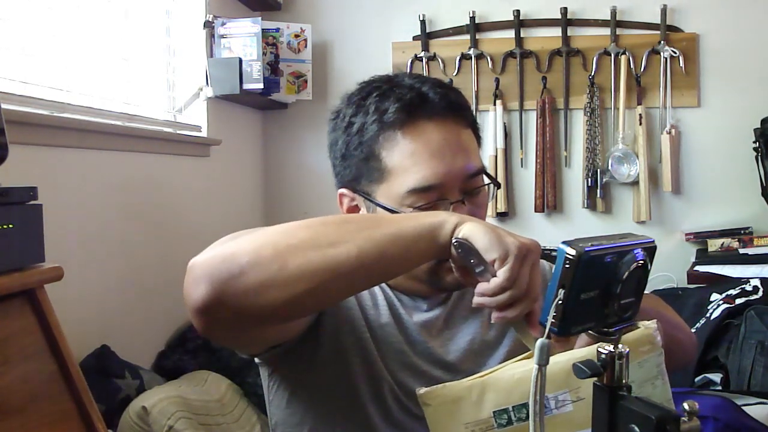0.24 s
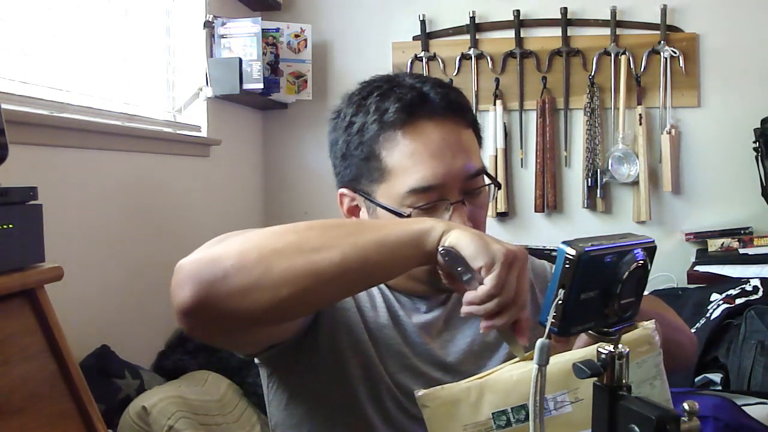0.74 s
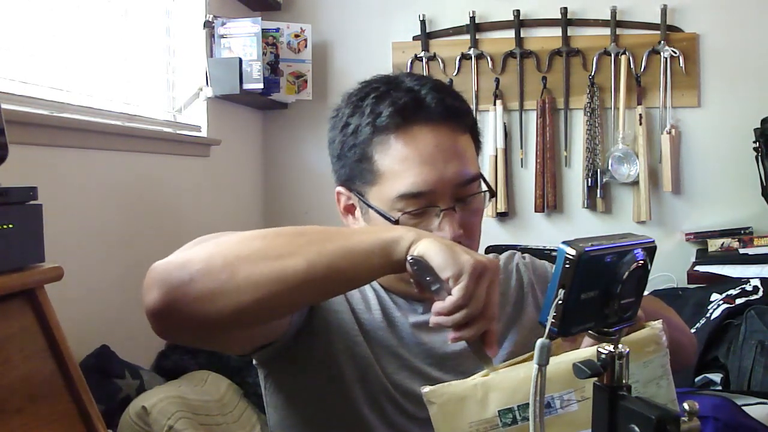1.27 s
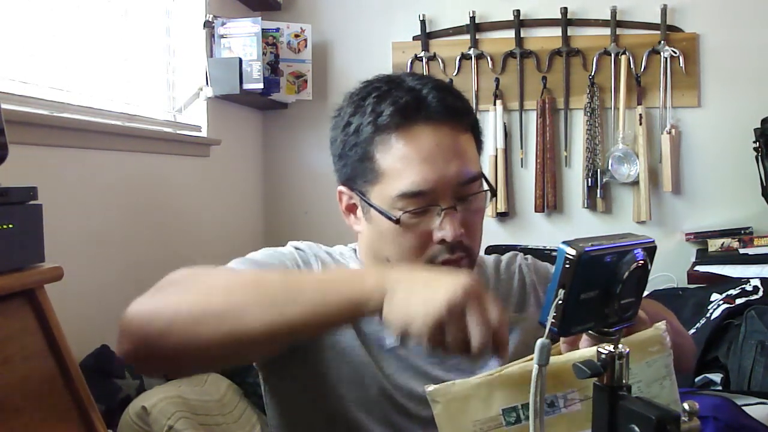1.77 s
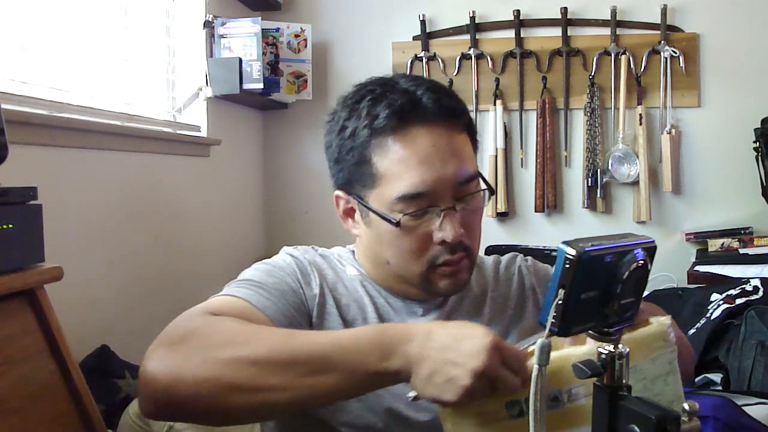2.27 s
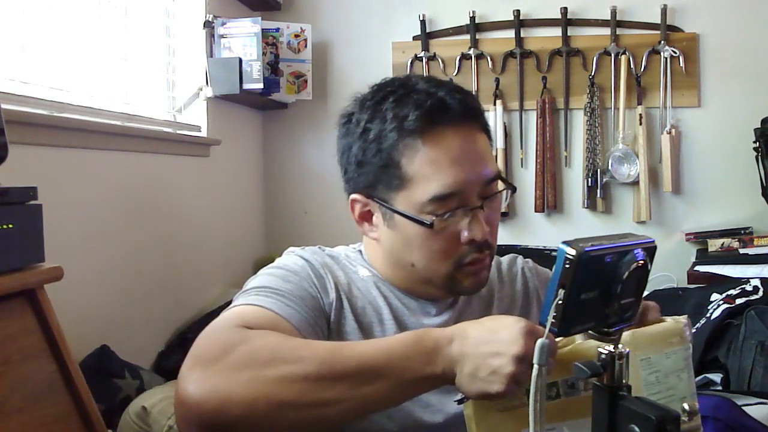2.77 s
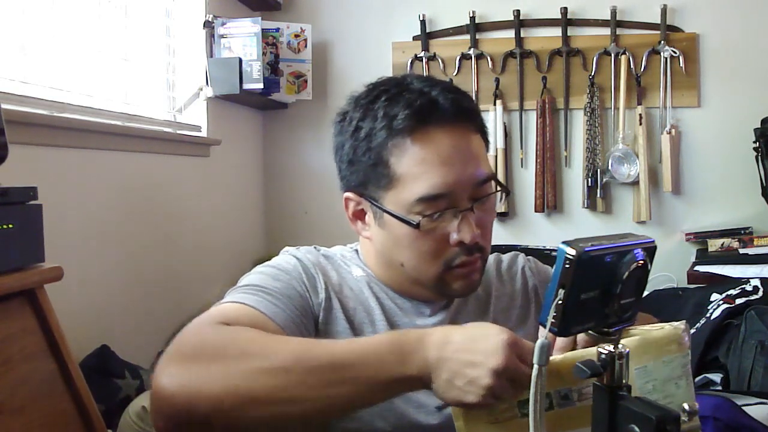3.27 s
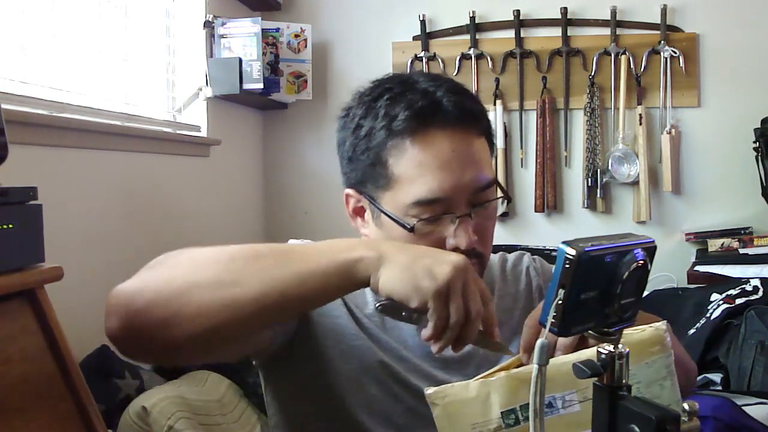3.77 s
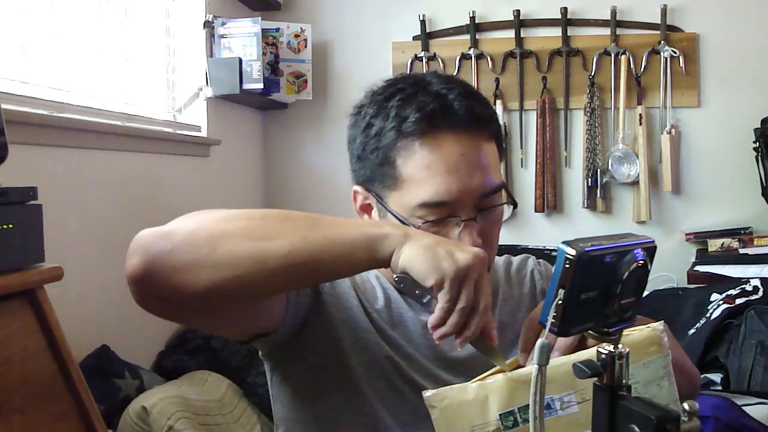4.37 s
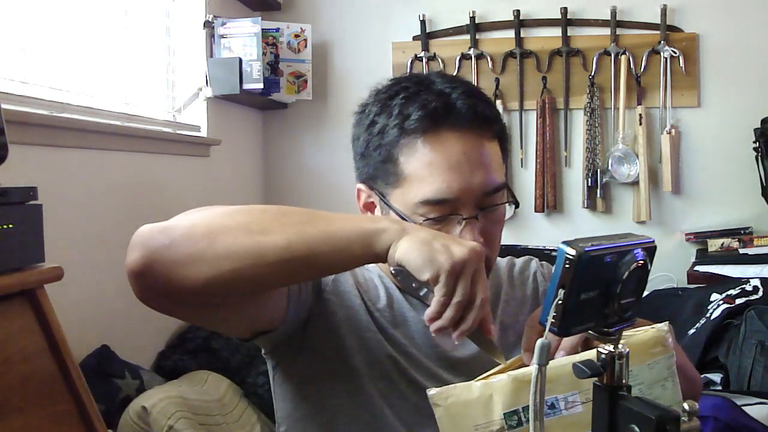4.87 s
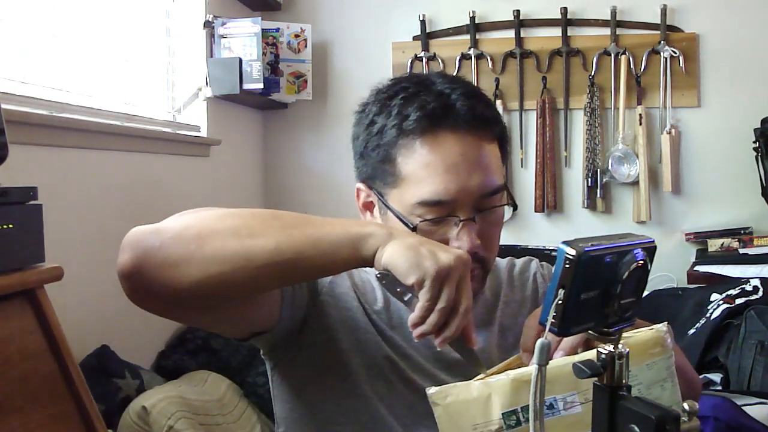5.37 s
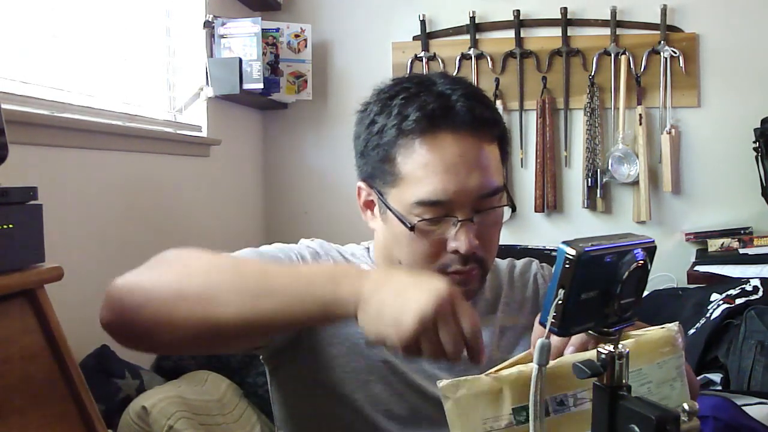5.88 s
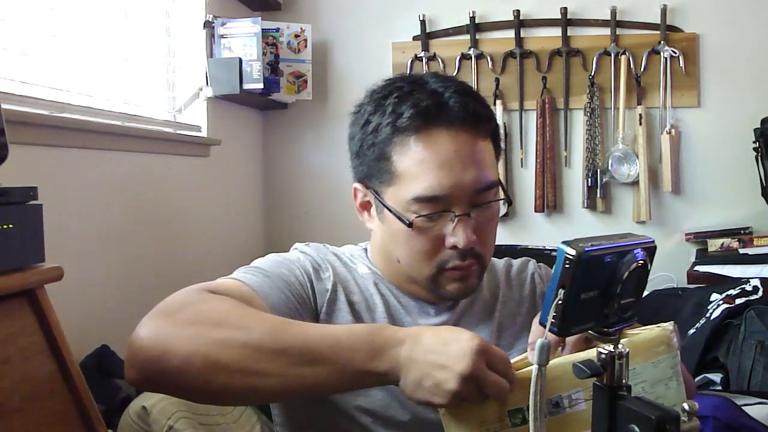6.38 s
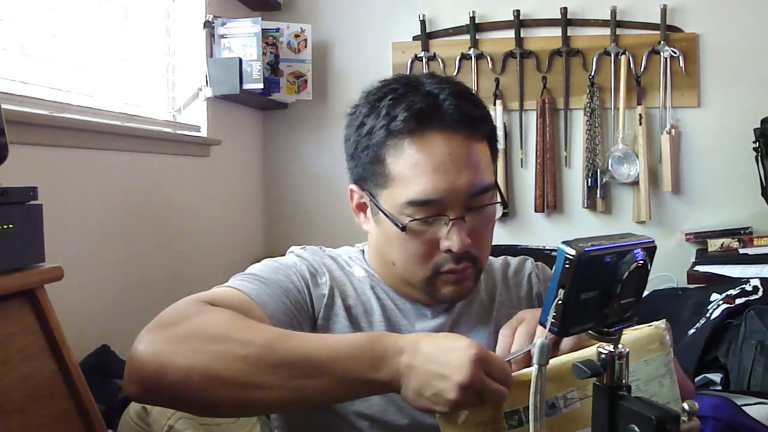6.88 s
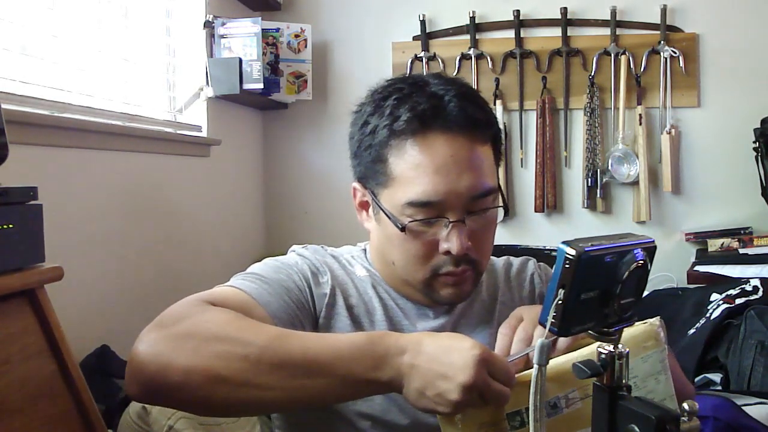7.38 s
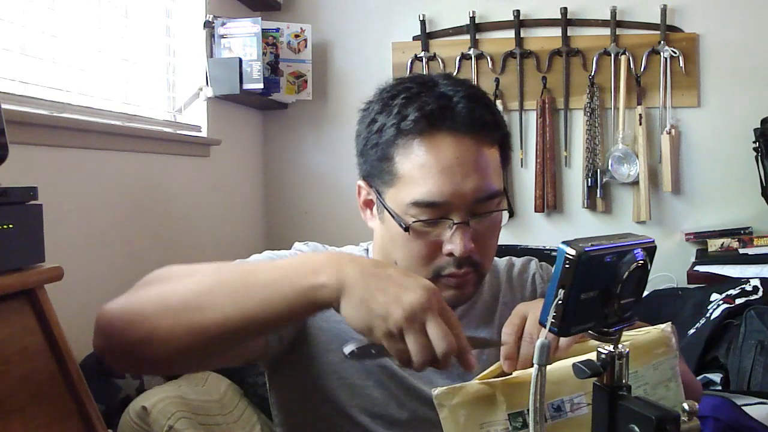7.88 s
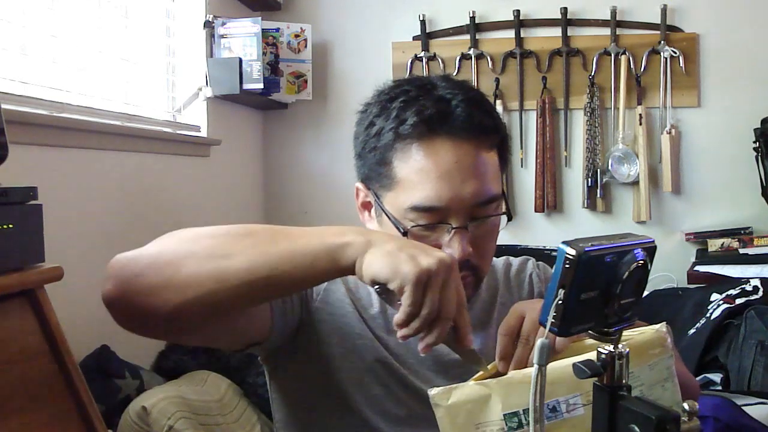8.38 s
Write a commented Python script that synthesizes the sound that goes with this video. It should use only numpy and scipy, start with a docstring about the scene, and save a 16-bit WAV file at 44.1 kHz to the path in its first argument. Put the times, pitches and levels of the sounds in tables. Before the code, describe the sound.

A small knife slits a padded paper envelope in irregular bursts of tearing, rustling and sharp crinkles, over a faint fan hum.

```python
"""At a desk in a small soft room, close to a cheap camera microphone: a knife slits a padded envelope.
The blade tears fibres in dense bursts, the paper rustles and buckles with sharp snaps, and a finger
squeaks once on the film. Desk and walls throw it all back. Behind it a fan hums under the microphone's
hiss and thin electric ticks; the camera's low sample rate cuts off and mirrors the treble."""
import sys
import numpy as np
from scipy import signal
from scipy.fft import rfft, irfft, next_fast_len
from scipy.io import wavfile
from scipy.ndimage import uniform_filter1d

SR = 44100
rng = np.random.default_rng(int(sys.argv[2]) if len(sys.argv) > 2 else 0)


def wav_record(signal):
    """Record a signal, one row per channel, as 16-bit PCM in the file named by sys.argv[1]."""
    frames = np.transpose(np.atleast_2d(signal))
    bounded = np.clip(frames, -1, 1)
    # unit amplitude maps onto the largest positive 16-bit level
    quanta = np.round(bounded * 32767).astype(np.int16)
    wavfile.write(sys.argv[1], SR, quanta)


N = 381024


def amp(db):
    return 10 ** (np.asarray(db) / 20)


def unit_rms(x):
    return x / np.sqrt(np.mean(x ** 2) + 1e-20)


def curve_at(points, hz):
    freq_hz, value = np.transpose(points)
    return np.interp(np.log(hz + 1), np.log(freq_hz + 1), value)


def add(mix, start_s, sound):
    part = mix[round(start_s * SR):][:len(sound)]
    part += sound[:len(part)]


def resonate(x, hz, width_hz):
    """Two-pole resonance of gain 1 at its centre."""
    b, a = signal.iirpeak(hz, hz / width_hz, SR)
    return signal.lfilter(b, a, x)


def low_pass(x, hz):
    return signal.oaconvolve(x, signal.firwin(1023, hz, window=("kaiser", 11), fs=SR), "same")


def minimum_phase(gain_db):
    """Shortest impulse response with the given spectrum (folded cepstrum)."""
    cepstrum = irfft(gain_db * np.log(10) / 20)
    cepstrum[1:len(cepstrum) // 2] *= 2
    cepstrum[len(cepstrum) // 2 + 1:] = 0
    return irfft(np.exp(rfft(cepstrum)))


# Room tone, the fan's air and the microphone's own hiss: freq_hz, relative_db
HISS_SPECTRUM = [(18, -62), (30, -32.5), (190, -9), (304, -8), (352, -6.5), (702, -6), (774, -7), (920, -9),
                 (1660, -13), (1790, -13.5), (4450, -21), (5420, -20.5), (10800, -34), (14000, -67),
                 (22000, -120)]
# Hum of the fan in the room: pitch_hz, width_hz, level_db
FAN_TONES = [(299.2, 21, -53.5), (247.3, 8.4, -66)]


def fan_and_hiss(hiss_db=-47.5):
    """The bed of the room: smooth hiss with faint drifting patches, and fuzzy fan tones."""
    frames, hz = N // 256 + 5, np.fft.rfftfreq(1024, 1 / SR)
    real, imag, patches = rng.standard_normal((frames, 513, 3)).T
    patches = unit_rms(uniform_filter1d(uniform_filter1d(patches, 12, 0), 14, 1))
    spectra = (real + 1j * imag) * amp(curve_at(HISS_SPECTRUM, hz)[:, None] + 0.4 * patches)
    bed = amp(hiss_db) * unit_rms(signal.istft(spectra, nperseg=1024, noverlap=768)[1][:N])
    t = np.arange(N) / SR
    for pitch_hz, width_hz, level_db in FAN_TONES:
        fuzz = unit_rms(resonate(rng.standard_normal(N), pitch_hz, width_hz))
        bed += amp(level_db) * (0.64 * fuzz + 1.03 * np.sin(2 * np.pi * pitch_hz * t))
    return bed


# Resonances that colour each tick: pitch_hz, width_hz, relative_db
TICK_COLOUR = [(5500, 1300, 6), (6600, 1300, 7)]
# The ticks come and go: time_s, level_db
TICK_LEVELS = [(0, -44), (1.3, -44), (1.45, -35), (2.0, -37.5), (2.3, -44), (3.8, -45), (4.0, -41.5),
               (4.9, -41), (5.2, -39), (8.2, -49), (8.4, -42), (8.64, -40.5)]


def electric_ticks(rate_hz=59.93, first_s=.0026):
    """Thin dry ticks at a steady rate, probably the camera's electronics; one in five drops out."""
    times = np.arange(first_s, N / SR, 1 / rate_hz)
    sizes = amp(3.4 * rng.standard_normal(len(times)))
    train = np.zeros(N)
    train[(times * SR).astype(int)] = sizes * (rng.random(len(times)) < .8)
    ticks = sum(amp(db) * resonate(resonate(train, hz, width), hz, width)
                for hz, width, db in TICK_COLOUR)
    level_db = np.interp(np.arange(N) / SR, *np.transpose(TICK_LEVELS))
    return amp(level_db) * ticks / np.percentile(abs(ticks), 99.9)


# Decay of the small soft room: freq_hz, t60_s
WALL_DECAY = [(400, 0.073), (1000, 0.17), (2800, 0.14), (7400, 0.2)]


def wall_tail(level_db):
    """Sparse random reflections from the walls, each band dying at its own speed."""
    taps = np.zeros(SR // 2)
    slots = np.arange(200, len(taps) - 10, 10)
    taps[slots + rng.integers(0, 10, len(slots))] = rng.choice([-1., 1.], len(slots))
    hz, t, spectra = signal.stft(taps, SR, nperseg=128)
    decay = amp(-60 * t / curve_at(WALL_DECAY, hz)[:, None])
    tail = signal.istft(spectra * decay, SR, nperseg=128)[1]
    return amp(level_db) * tail / np.linalg.norm(tail)


# Desk, chest and wall as heard at the microphone: delay_ms, level_db
NEAR_ECHOES = [(1.4, -17), (2.3, -16), (5.2, -28), (7.5, -22), (11.5, -17.5)]


def room(x, tail_db, crossfade_hz=7):
    """Direct sound, near echoes, and four random tails steadily crossfaded so that no pitch rings."""
    near = np.zeros(SR // 50)
    near[0] = 1
    for delay_ms, level_db in NEAR_ECHOES:
        near[round(delay_ms * SR / 1000)] += amp(level_db)
    out = signal.oaconvolve(x, near)[:N]
    turn = np.pi * crossfade_hz * np.arange(N) / SR
    for k in range(4):
        share = np.sqrt(.5) * np.cos(turn + np.pi * k / 4)  # squares of the four shares sum to 1
        out += signal.oaconvolve(x * share, wall_tail(tail_db))[:N]
    return out


# A finger drags on the envelope's film: time_s, pitch_hz, level_db
SQUEAK_PATH = [(3.851, 1180, -56), (3.861, 1020, -61), (3.874, 1030, -38), (3.912, 1116, -47),
               (3.95, 1010, -49)]


def finger_squeak():
    """One breathy squeak: a gliding tone whose level stutters."""
    out = np.zeros(N)
    time_s, pitch_hz, level_db = np.transpose(SQUEAK_PATH)
    t = np.arange(time_s[0], time_s[-1], 1 / SR)
    stutter = 1 + 0.78 * unit_rms(uniform_filter1d(rng.standard_normal(len(t)), 150))
    tone = np.sin(2 * np.pi * np.cumsum(np.interp(t, time_s, pitch_hz)) / SR) * stutter
    add(out, time_s[0], amp(np.interp(t, time_s, level_db)) * tone * signal.windows.tukey(len(t), .3))
    return out


# Modes of the padded pouch: pitch_hz, base_width_hz, relative_db
POUCH_MODES = [(829, 47, 5), (1220, 45, -1), (1502, 52, -1.5), (1904, 25, 3), (2420, 24.5, 4.5),
               (3100, 66, -13), (3060, 250, -20), (3790, 53, -11), (4513, 37, -7.5), (4860, 710, -13.5),
               (5830, 270, -15)]


def pouch(x, ring_db, widen=3.6):
    """The air-filled pouch rings a little at its own modes."""
    ring = sum(amp(db) * resonate(x, hz, widen * width) for hz, width, db in POUCH_MODES)
    return x + amp(ring_db) * ring


# Colour of tearing paper, heard close: freq_hz, relative_db
PAPER_SPECTRUM = [(150, -56), (250, -26), (293, -2.5), (516, -8.5), (567, -0.5), (802, -9.5), (1030, -1),
                  (1560, -0.5), (4540, -1), (10800, -16.5), (14000, -100), (22000, -120)]


def breaking_fibres(motion, clump_db, size_db, breaks_per_s=12000):
    """Fibres break as dense, uneven clicks in clumps; motion(hz, t) shapes their level and colour."""
    clumps = amp(clump_db * unit_rms(uniform_filter1d(rng.standard_normal(N), 180)))
    sizes = amp(size_db * np.minimum(rng.exponential(1, N), 5)) * rng.choice([-1., 1.], N)
    breaks = clumps * sizes * (rng.random(N) < breaks_per_s / SR)
    hz, t, spectra = signal.stft(unit_rms(pouch(breaks, ring_db=0.25)), SR, nperseg=256, noverlap=192)
    hz = hz[:, None] + 1
    patches = rng.standard_normal(spectra.T.shape)
    patches = unit_rms(uniform_filter1d(uniform_filter1d(patches, 24, 0), 4, 1)).T
    colour = amp(curve_at(PAPER_SPECTRUM, hz))
    colour /= np.sqrt(np.mean(colour ** 2 * (hz > 1500) * (hz < 4500)))
    shaped = spectra * colour * motion(hz, t) * amp(1.7 * patches)
    return signal.istft(shaped, SR, nperseg=256, noverlap=192)[1][:N]


def grip_db(hz, boom_db, fizz_db):
    """The grip on the paper tilts the low end (boom of the pouch) and the high end (fizz)."""
    return np.clip(np.log2(2200 / hz), 0, 1) * boom_db + np.clip(np.log2(hz / 3600), 0, 1) * fizz_db


# Fingers shift the envelope at the desk throughout: time_s, level_db, boom_db, fizz_db
FINGER_MOVES = [(0, -45, 7, 3), (.1, -36, -17, -15), (.2, -61, -10, -10), (.64, -71, -14, -15),
                (1.42, -56, -12, -0.5), (2.12, -55.5, 4.5, 1), (2.4, -51.5, -3, -2), (2.64, -53, 2, 4.5),
                (2.98, -47.5, 0.5, 1.5), (3.4, -56.5, 2, -11), (3.56, -46, 1, -7), (3.75, -57, -5, 1),
                (4.9, -58, -2, -7), (5.55, -50.5, 7, 5), (5.75, -60, -13, 5), (6.25, -52.5, 3, -7),
                (6.4, -50, -1, 1), (6.53, -54.5, -5, -3), (7.7, -57.5, -2, 1), (8.1, -59, -10, -12),
                (8.64, -61, -2, -5)]


def fingers(hz, t):
    """The rustle of handling follows one slow curve of level and grip."""
    time_s, *columns = np.transpose(FINGER_MOVES)
    level_db, boom_db, fizz_db = (np.interp(t, time_s, column) for column in columns)
    return amp(level_db + grip_db(hz, boom_db, fizz_db))


def handling_snaps(per_s=4, above_handling_db=17, spread_db=3):
    """Rows of small snaps that fall at random, following the strength of the handling."""
    when, pitch = rng.random((round(per_s * N / SR), 2)).T
    scatter_db = spread_db * rng.standard_normal((len(when), 4))
    start_s = when * N / SR
    handling_db = np.interp(start_s, *np.transpose(FINGER_MOVES)[:2])
    peak_db = handling_db + above_handling_db + scatter_db[:, 0]
    colour_db = scatter_db[:, 1:] + (-18, -9, -9)  # boom, body, crack
    return list(zip(start_s, peak_db, 720 * 5 ** pitch, *colour_db.T))


# Paper buckles near the microphone: start_s, peak_db, pitch_hz, boom_db, body_db, crack_db
BUCKLES = [(0.0545, -1.5, 1320, -13, -15, -35), (0.1278, -27, 3810, -21, -18, -20),
           (0.164, -30.5, 1210, -17, -23, -34), (0.222, -30.5, 1980, -17, -8, -19),
           (0.2502, -22.5, 2740, -20, -8, -18.5), (0.3006, -29, 1500, -16, -10, -16.5),
           (0.401, -11, 1240, -16, -17.5, -26.5), (0.5132, -17, 2800, -27, -1, -11.5),
           (0.5568, -20, 4400, -24, -7, -16), (0.6335, -27.5, 3810, -16, -8, -16),
           (0.9464, -11, 2430, -17, -5, -16), (1.3117, -30, 1350, -3, -6, -20),
           (1.589, -20, 1570, -13, -18, -24), (1.6146, -6, 4300, -8, -7, -24),
           (1.6464, -19.5, 2670, -26, -11, -16), (1.7479, -30, 740, -19, -9, -11),
           (1.7707, -30, 732, -15, -6, -9), (1.8827, -29, 1890, -10, -6, -21),
           (1.9121, -30.5, 800, -5, -12, -19), (1.9924, -27.5, 1520, -22, -19, -31),
           (2.2509, -21.5, 1440, -12, -19, -35), (2.3078, -9, 1980, -22, -12, -32.5),
           (2.3694, -31, 797, -2, -12, -25), (2.409, -28, 815, -2, -28, -25),
           (2.4259, -19, 813, -18, -29, -49), (2.4314, -18, 830, -15, -22, -46),
           (2.4754, -10.5, 1870, -14, -16, -33), (2.4904, -6, 1500, -12, -5, -25),
           (2.519, -5.5, 1580, -5.5, -6, -17.5), (2.574, -20, 760, -10.5, -20, -30),
           (2.6488, -25, 824, -10, -13, -35), (2.7488, -20, 2890, -23, -19, -27),
           (2.801, -17, 1430, -15, -18.5, -33), (2.8184, -16, 1950, -13, -9.5, -23),
           (2.9098, -21.5, 2140, -21, -18, -10), (3.056, -40, 1280, -10, -2, -14),
           (3.0907, -14.5, 4460, -16.5, -7.5, -22.5), (3.2925, -8.5, 2750, -23.5, -10, -28.5),
           (3.5438, -13, 1860, -23, -10.5, -19.5), (3.5937, -24.5, 2490, -21, -11.5, -32),
           (3.6738, -24.5, 3960, -23, -3.5, -13), (3.72, -27.5, 2030, -14, -6, -8),
           (3.9691, -29, 713, -20, -7, -18), (4.0464, -27, 2420, -22, -6, -19),
           (4.0572, -21, 2440, -21, -7, -15), (4.3814, -23.5, 3040, -27, -2, -6),
           (4.4573, -29.5, 3940, -22, -13, -16), (4.5308, -12.5, 2070, -24, -6, -14),
           (4.6561, -9.5, 2020, -30, -1.5, -8), (4.801, -29, 797, -7, -18, -33),
           (5.3214, -29, 2480, -22, -6, -7), (5.338, -22.5, 3030, -25, -9, -15),
           (5.3991, -18, 1520, -24, -15, -20), (5.5066, -23, 2470, -22, -16, -29),
           (5.553, -18.5, 1920, -25, -11, -36), (5.598, -5, 1600, -25, -9, -28.5),
           (5.6472, -23.5, 3840, -24, -5, -9), (5.7015, -18, 1390, -21.5, -5, -26),
           (5.7498, -27.5, 840, -12.5, -6, -18), (5.9155, -25.5, 4300, -16, -9, -13),
           (6.3047, -28, 1410, -18, -16, -21), (6.3579, -17, 2960, -27, -19.5, -36),
           (6.3998, -11, 2610, -30.5, -18, -37), (6.4545, -15, 2300, -14, -8.5, -30),
           (6.5136, -28, 1240, -5, -12, -30), (6.567, -27.5, 2050, -13, -12, -25),
           (6.787, -24.5, 1590, -25, -7, -12), (6.8024, -18.5, 1390, -24, -23, -27),
           (6.8432, -13.5, 1270, -12.5, -12.5, -29), (6.9481, -30.5, 1930, -28, -11, -17),
           (6.9957, -16, 1520, -17, -13.5, -19.5), (7.0482, -17.5, 2290, -15, 0, -11),
           (7.0666, -19.5, 3100, -24, -15, -21), (7.2024, -19.5, 1480, -11, -8, -4),
           (7.358, -30, 1390, -14, -10, -11), (7.4453, -25, 1020, -14, -16, -23),
           (7.56, -29, 1920, -13, -11, -21), (7.573, -16, 3550, -16, -8.5, -15.5),
           (7.6033, -22.5, 1280, -15, -14, -29), (7.7054, -32, 2150, -20, -14, -25),
           (7.8411, -24.5, 2370, -12, -13, -22), (7.9673, -32, 907, -18, -15, -27),
           (7.9804, -38, 719, -12, -19, -28), (8.0943, -34, 2650, -10, -8, -10),
           (8.2646, -25, 1630, -20, -12, -14.5)]


def buckling_snaps(creak_s=.008, creak_db=-35):
    """A patch of paper creaks and flips: a sharp click, a flutter, then crackle as the crease settles."""
    out, t, hz = np.zeros(N), np.arange(3500) / SR, np.fft.rfftfreq(1024, 1 / SR)
    rows = BUCKLES + handling_snaps()
    noises = rng.standard_normal((len(rows), 2, len(t)))
    for (start_s, peak_db, pitch_hz, boom_db, body_db, crack_db), (noise, grain) in zip(rows, noises):
        colour = [(150, boom_db - 22.5), (450, boom_db - 0.5), (800, boom_db + 6), (1600, -7.5),
                  (3200, body_db + 3), (5000, body_db - 0.7),
                  (7500, crack_db + 4.5), (12000, crack_db - 6.5)]
        patch_db = 4.6 * np.exp(-(np.log2((hz + 1) / pitch_hz) / 0.31) ** 2)
        click = minimum_phase(curve_at(colour, hz) + patch_db)
        flutter = 0.35 * noise * np.exp(-t / 0.002)
        crackle = noise * grain * np.exp(-t / 0.025) * np.minimum(t / 0.004, 1)
        drive = flutter + amp(-30.5 - 0.25 * peak_db) * crackle  # soft snaps carry more crackle
        drive[0] = 1  # the flip itself
        creak = grain[:round(creak_s * SR)]
        drive = np.concatenate([amp(creak_db) * creak * creak[::-1], drive])
        snap = signal.oaconvolve(drive, click)
        add(out, max(start_s + .0009 - creak_s, 0), amp(peak_db) * snap / abs(snap).max())
    return pouch(out, ring_db=-5)


# In the foreground, each pull of the blade or slide of the paper:
# start_s, length_s, level_db, swell_db, boom_db, fizz_db, rasp_hz
BLADE_PULLS = [(0.053, .006, -43, 0, -9, -1, 3000), (0.68, 0.012, -36.5, 0.5, 1, 5.5, 3870),
               (0.733, 0.052, -34.5, 4.5, 1, 2.5, 3450), (0.859, 0.16, -33.5, 1, -1, 0.5, 3700),
               (1.015, 0.14, -36.5, -8, 5, 3, 2330), (1.191, 0.069, -39, -0.5, 6.5, 4.5, 2210),
               (1.302, 0.031, -45, 2.5, 5.5, 3, 2560), (1.594, .012, -40, -1, -6, -2, 1800),
               (2.168, 0.1, -51.5, 5.5, -1, 1.5, 1900), (2.652, 0.036, -44, -3.5, 2.5, -29, 2390),
               (3.225, 0.032, -55, 0, 1.5, -15, 2060), (3.289, .005, -44.5, -1, 6, 5, 1500),
               (3.475, 0.095, -54.5, -3, 6, 8, 2100), (4.34, 0.053, -50, 0, 0, -4, 2290),
               (4.485, 0.074, -52, 17, -6, 3, 2770), (4.645, 0.065, -36, 6, 2.5, 4, 2700),
               (5.026, 0.026, -51.5, -3, -1, 7, 2550), (5.114, 0.044, -33.5, 7, -4, 1.5, 1860),
               (5.231, 0.018, -32, -2.5, -3, 2.5, 2100), (5.279, 0.067, -41, -5.5, -1, 6, 2890),
               (5.402, 0.044, -39.5, -3, -2, 2.5, 2290), (5.48, 0.013, -38.5, 8.5, 0, 3.5, 2270),
               (6.301, 0.029, -44.5, 10, 2, -0.5, 1950), (6.566, 0.15, -50.5, -1.5, 3, 7, 2830),
               (6.799, .012, -41.5, -1.5, 2, 9, 1530), (6.844, 0.019, -40.5, -1, -19, 7, 1990),
               (7.002, .045, -46, 2, 5, 10, 2000), (7.071, 0.091, -47, 10, 3, 9.5, 2470),
               (7.452, 0.023, -46, 0, 1.5, -1, 1600), (7.717, .07, -59, 4.5, 9, -5, 2000)]


def blade(hz, t, bite_db_per_s=912, ease_db_per_s=408, rasp_db=5, rasp_octaves=0.75):
    """Each pull bites quickly, swells or sags along its length, then eases off."""
    power = 0
    for start_s, length_s, level_db, swell_db, boom_db, fizz_db, rasp_hz in BLADE_PULLS:
        shape_db = (swell_db * np.clip((t - start_s) / length_s, 0, 1)
                    - bite_db_per_s * np.maximum(start_s - t, 0)
                    - ease_db_per_s * np.maximum(t - start_s - length_s, 0))
        rasp_band = np.exp(-(np.log2(hz / rasp_hz) / rasp_octaves) ** 2)
        colour = amp(grip_db(hz, boom_db, fizz_db) + rasp_db * rasp_band)
        power += (colour * amp(level_db + np.maximum(shape_db, -100))) ** 2
    return np.sqrt(power)


def scene():
    """The envelope sounds through the room to one microphone, over fan, hiss and ticks."""
    tearing = breaking_fibres(blade, clump_db=1.5, size_db=2.6)
    rustle = breaking_fibres(fingers, clump_db=2.5, size_db=3.2)
    envelope = tearing + rustle + buckling_snaps() + finger_squeak()
    return (room(envelope, tail_db=-6) + fan_and_hiss() + electric_ticks())[None]


# Treble mirrored by the camera's rate converter: freq_hz, gain_db
MIRROR_GAIN = [(12900, -8.5), (14000, -17), (15700, -27)]


def record(dry, overload=.9, capture_hz=24000, capture_edge_hz=11030, top_hz=15740):
    """Peaks clip in the camera; its weak converter mirrors the treble above half the capture rate."""
    captured = low_pass(np.clip(dry[0], -overload, overload), capture_edge_hz)
    analytic = signal.hilbert(captured, next_fast_len(N))[:N]
    flipped = (analytic.conj() * np.exp(2j * np.pi * capture_hz * np.arange(N) / SR)).real
    hz = np.fft.rfftfreq(N, 1 / SR)
    band = (hz > capture_hz / 2) * (hz < top_hz + 500)
    mirror = irfft(rfft(flipped) * amp(curve_at(MIRROR_GAIN, hz)) * band, N)
    return low_pass(captured + mirror, top_hz)[None]


dry = scene()
out = record(dry)
wav_record(out)
```